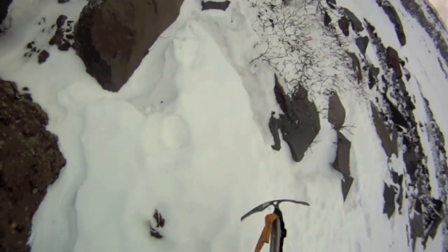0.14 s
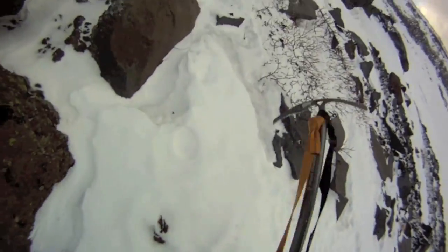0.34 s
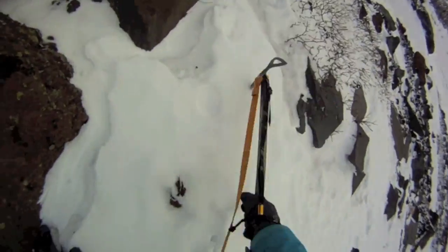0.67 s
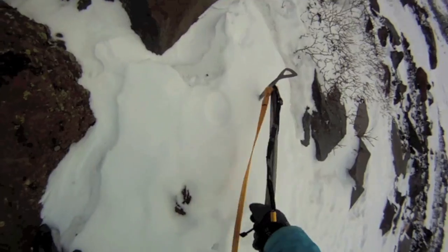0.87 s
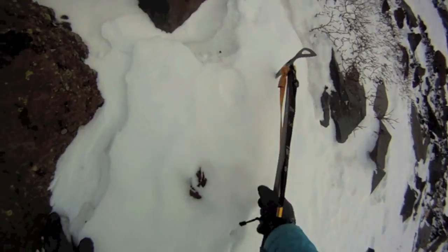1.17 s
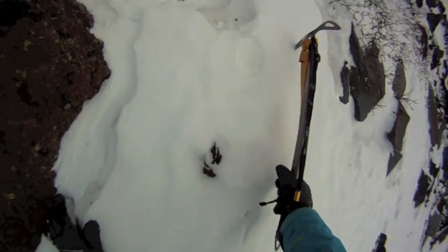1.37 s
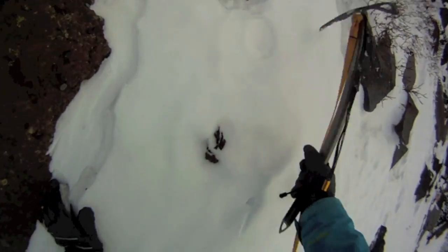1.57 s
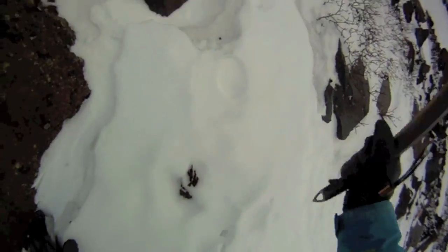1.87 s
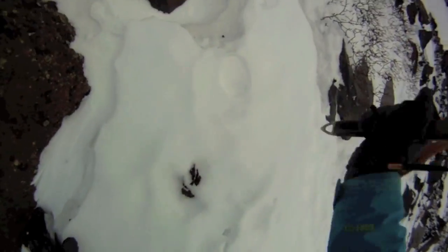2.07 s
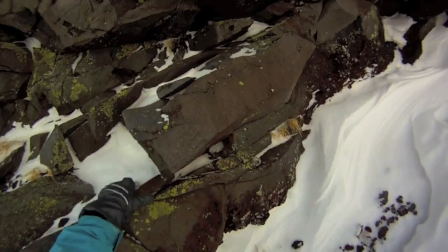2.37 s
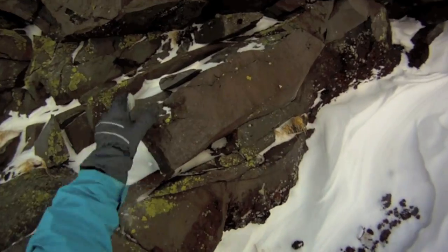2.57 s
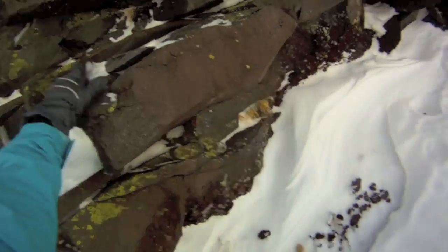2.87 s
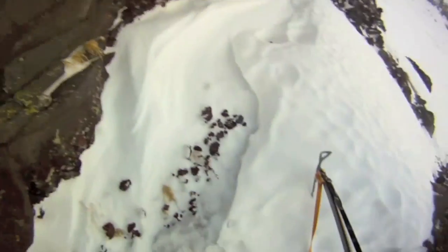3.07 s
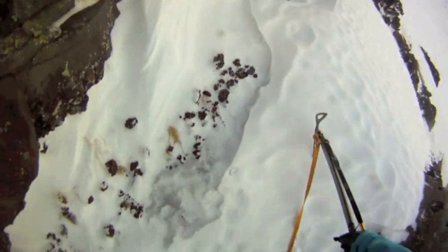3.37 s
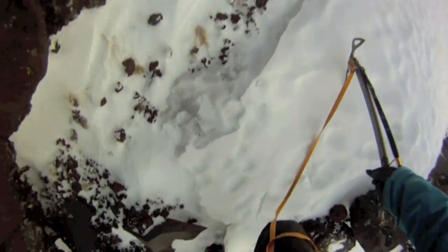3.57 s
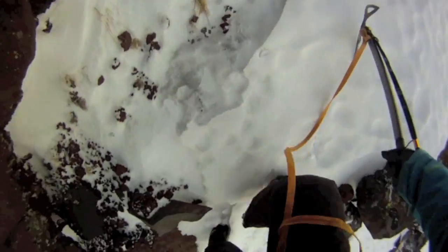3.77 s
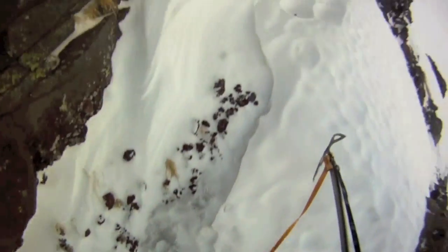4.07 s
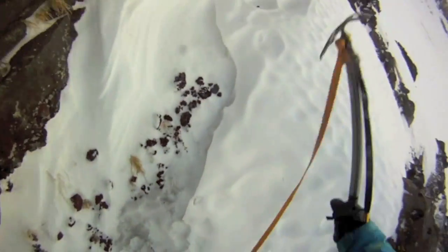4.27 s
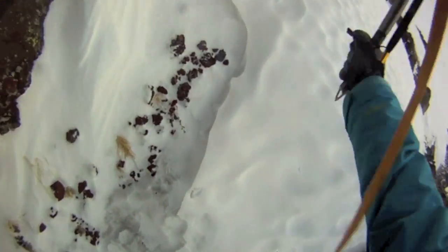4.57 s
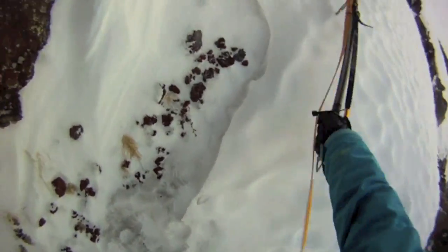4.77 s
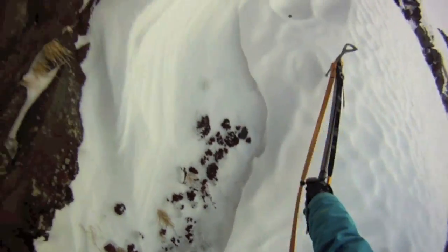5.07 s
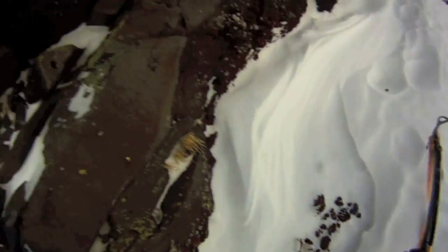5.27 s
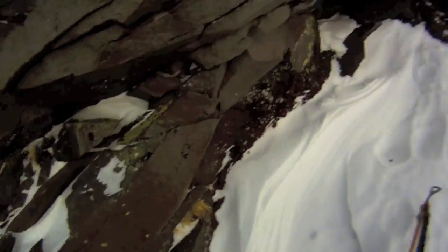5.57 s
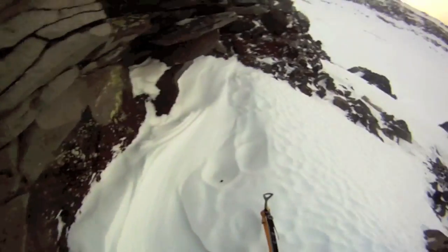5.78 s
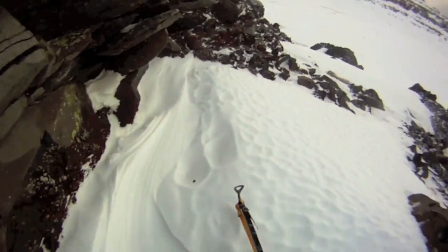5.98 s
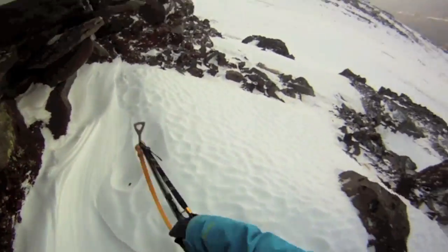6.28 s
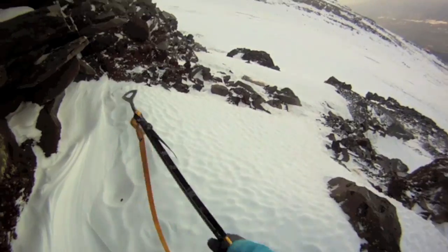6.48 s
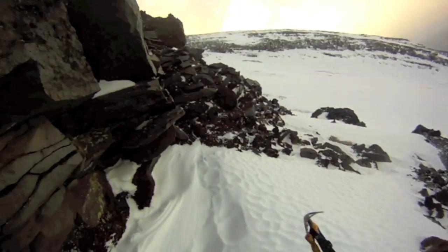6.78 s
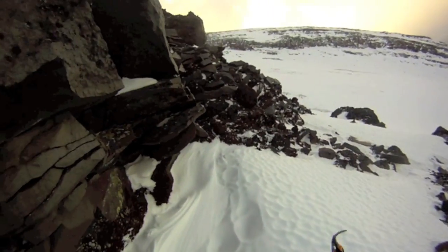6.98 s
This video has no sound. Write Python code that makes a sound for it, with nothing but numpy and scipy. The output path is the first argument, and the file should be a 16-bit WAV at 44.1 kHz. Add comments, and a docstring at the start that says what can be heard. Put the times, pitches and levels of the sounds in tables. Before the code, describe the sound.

Close, low-quality outdoor sound from a climber's head. Sharp bites and raspy scrapes in snow crust come first, tinny and repeating quickly. A near-silent instant leads into full wind, with deep thuds and fluttering rumble that briefly push down the hiss. Soft sleeve and snow rustles fill gaps; later crunches ring metallic and a long stuttering squealing scrape precedes more buffeting.

```python
"""Crunches, scrapes and squeals of steel in hard snow, under gusty wind, as a climber works up a steep slope.
Crampons and an ice axe break the crust and set the steel ringing; cloth and loose snow rustle in noise grains.
Turbulence buffets the microphone of a small head camera; its 12 kHz converter mirrors all into a glassy treble.
The first stretch is thin, with its bass cut and a fast repeating echo; a short fade leads into the full wind."""
import sys
import numpy as np
from scipy import signal
from scipy.fft import rfft, irfft, next_fast_len
from scipy.io import wavfile
from scipy.ndimage import uniform_filter1d

SR = 44100
rng = np.random.default_rng(int(sys.argv[2]) if len(sys.argv) > 2 else 0)


def store_pcm(level_fs):
    """Save levels as 16-bit WAV."""
    pcm = np.round(np.clip(level_fs, -1, 1) * 32767).astype(np.int16)
    wavfile.write(sys.argv[1], SR, np.atleast_2d(pcm).T)


N = 314853
TIME = np.arange(N) / SR

# gusts at the microphone: (start t/s, length t/s, relative level/dB)
GUSTS = [(0, 0.51, -29), (1.68, 0.13, -24.5), (2.21, 0.078, -21.5), (2.46, 0.042, -20), (2.55, 0.2, -28.5),
         (3.05, 0.039, -16.5), (3.23, 0.066, -36), (3.6, 0.27, -20.5), (3.93, 0.087, -31.5),
         (4.3, 0.04, -19), (4.43, 0.04, -6.5), (4.54, 0.25, -18), (4.84, 0.34, -21.5), (5.06, 0.057, -12),
         (5.18, 0.17, -16), (5.79, 0.19, -31), (6.09, 0.13, -15), (6.32, 0.29, -18), (6.7, 0.016, -21),
         (6.94, 0.27, -14)]
GUST_RISE_DB_PER_S, GUST_FALL_DB_PER_S, BREEZE_DB = 262, 157, -40.5
# spectrum of the buffeting: (f/Hz, relative level per Hz/dB)
BUFFET = [(12, -11.5), (40, -3), (70, 0.5), (120, -4.5), (180, -7), (280, -12), (450, -17.5), (650, -29),
          (950, -42.5), (2000, -57), (5000, -78)]
# sleeves rubbing and loose snow sliding as the climber moves: (start t/s, length t/s, level/dB)
SWISHES = [(0, 0.088, -37), (1.7, 0.55, -49.5), (2.46, 0.0094, -37), (2.58, 0.027, -37), (2.76, 0.39, -42),
           (3.59, .08, -31), (3.72, 0.19, -36), (3.88, 0.098, -29), (4.45, 0.011, -43), (5.72, 0.15, -37.5)]
SWISH_RISE_DB_PER_S, SWISH_FALL_DB_PER_S = 108, 114
SPINDRIFT_DB = -47  # snow blowing past all the time
# spectrum of cloth and blown snow: (f/Hz, relative level per Hz/dB)
RUSTLE_COLOUR = [(100, -12.5), (500, 8), (950, -4), (1300, 2), (1900, -5), (2650, 0.5), (3200, -8.5),
                 (4700, -14), (5700, -20)]
# points breaking into the crust, and two faint clicks as wind slaps, at 4.317 and 4.604 s: (t/s, relative
# level/dB, length t/s)
BITES_AND_CLICKS = [(0.095, -17.5, 0.01), (0.65, -15, 0.0055), (1.649, -27.5, 0.0076), (2.087, -29.5, 0.0016),
                    (2.173, -33.5, 0.0027), (2.319, -14, 0.0035), (2.3293, -19, 0.0064), (3.878, -24, .0057),
                    (3.886, -14.5, 0.0061), (4.244, -35.5, 0.0014), (4.317, -29.5, 0.00071), (4.604, -36.5, 0.0017),
                    (4.68, -32, 0.0044), (4.771, -28.5, 0.023), (4.801, -17, 0.0088), (4.888, -24, 0.0016),
                    (4.983, -23.5, 0.0063), (5.001, -21, 0.0038), (5.171, -29.5, 0.0027), (5.192, -25, 0.0027),
                    (5.228, -19.5, .003), (5.596, -16.5, 0.0025), (6.099, -16, 0.0045), (6.741, -44, .001),
                    (6.814, -39, 0.011), (6.898, -34, 0.0046)]
# points pushed or dragged through the crust:
# (start t/s, length t/s, relative level midway/dB, swell from start to end/dB)
STROKES = [(0.1, 0.084, -31, 3.5), (0.652, 0.019, -25.5, 12), (0.702, 0.046, -28, 1),
           (0.811, 0.071, -23, 5), (1.03, 0.085, -32, -5), (1.108, 0.031, -20, -4.5),
           (1.231, 0.33, -25.5, -1), (2.094, .03, -35.5, -1), (2.187, 0.041, -45, -8.5),
           (3.248, 0.14, -40.5, 10.5), (3.874, 0.084, -30, -15), (3.94, 0.043, -24.5, 8),
           (4.02, 0.18, -39.5, -9), (4.813, 0.038, -23.5, -5), (4.885, 0.053, -20, -6.5),
           (4.986, 0.027, -26, -1), (5.027, 0.18, -35.5, 8), (5.241, 0.14, -26.5, -4),
           (5.393, 0.27, -22, 3), (6.059, 0.031, -31.5, 12), (6.104, 0.056, -22.5, -7),
           (6.27, 0.093, -47, 2), (6.815, .06, -55, 12), (6.889, 0.023, -39, 2)]
STROKE_RISE_S, STROKE_FALL_S = .005, .018  # time constants as the weight comes on and off
# how jerkily the crust gives way: (t/s, stick-slip depth/dB)
JERK = [(0, -6.5), (3.3, 2.5), (5.3, 4.5), (5.42, 0), (5.65, 3)]
SLIP_EVEN_S, GRIND_EVEN_S = .05, .04
# spectrum of breaking crust: (f/Hz, relative level per Hz/dB)
CRUST = [(150, -24), (700, -9.5), (950, -13.5), (1250, -7.5), (1500, -8), (2200, -2.5), (2680, 2),
         (2980, -12.5), (3400, -2.5), (4100, -14), (4750, -8.5), (5800, -13.5)]
# ringing modes of the steel: (f/Hz, relative level/dB, 60 dB decay t/s)
STEEL = [(1301, -43, 0.11), (2280, -28.5, 0.06), (2700, -48, 0.075), (3177, -33, 0.054), (4850, -57, 0.23),
         (4740, -37, 0.094), (5170, -37, 0.033)]
# steel squealing on packed snow, and a few narrow tones of struck steel ringing on after hard bites (such as
# near 4.75 kHz at 2.336 and 6.135 s): (start t/s, length t/s, pitch f/Hz, resonator width f/Hz, level/dB)
SQUEALS = [(0.6515, .006, 2480, 160, -11), (0.70, .06, 2680, 400, -28), (0.82, .06, 1260, 120, -31),
           (1.245, .03, 3265, 70, -25), (1.28, .14, 3620, 200, -32), (2.319, .003, 2330, 80, -13),
           (2.331, .007, 2640, 30, -12), (2.336, .016, 4760, 15, -35), (3.33, .09, 3500, 300, -47),
           (4.82, .045, 2680, 330, -28), (5.03, .19, 5000, 450, -44), (5.23, .3, 3620, 160, -37),
           (5.37, .075, 3610, 85, -29), (5.46, .22, 2570, 100, -27), (5.54, .14, 3615, 80, -31),
           (5.55, .13, 3060, 80, -35), (6.115, .035, 2800, 250, -26), (6.135, .038, 2210, 50, -27),
           (6.135, .05, 4750, 50, -39), (6.157, .022, 3270, 70, -39)]
# single eddies slapping the microphone: (t/s, relative level/dB, f/Hz)
SLAPS = [(2.486, 8, 134), (3.058, 3, 110), (4.321, 13, 152), (4.534, 3, 131), (4.721, 4.5, 141),
         (5.004, 1, 205), (5.067, -3, 80), (5.602, -1, 268), (6.198, -3, 75), (6.219, -5, 280),
         (6.243, -5, 240), (6.387, 2, 105), (6.947, 5, 106), (7.128, -5, 121)]
SLAP_TEAR = 0.19  # how strongly fine turbulence tears each eddy
# microphone and converter
LIMIT_DB, LIMIT_RELEASE_DB_PER_S, LIMIT_ATTACK_S = 1.0, 26, 0.0017
CONVERTER_HZ, CUTOFF_HZ = 12000, 15350
# the thin first stretch
BASS_CUT_HZ = 1760
ECHO_S, ECHO_END_S = .1183, 2.39
ECHO_SHARE, ECHO_FEEDBACK = 0.74, 0.5452
# gain through the fade between the two stretches: (t/s, level/dB)
FADE = [(2.34, -2), (2.37, -21), (2.39, -41), (2.405, -6.5), (2.43, -3)]


def from_db(db):
    """Amplitude ratio of a level in dB."""
    return 10 ** (np.asarray(db) / 20)


def rms_one(x):
    """Scales x to rms 1."""
    return x / np.sqrt(np.mean(x ** 2) + 1e-20)


def in_time(rows):
    """A curve over time joined by straight lines."""
    return np.interp(TIME, *np.transpose(rows))


def drift(rate):
    """Smooth chance of spread 1 that changes about rate times a second."""
    # two equal poles smooth noise at a tenth of SR; the first 4000 steps settle unheard
    pole = np.exp(-20 * np.pi * rate / SR)
    noise = rng.standard_normal(N // 10 + 4002)
    slow = signal.lfilter([1], [1, -2 * pole, pole * pole], noise)[4000:]
    return np.interp(np.arange(N) / 10, np.arange(len(slow)), rms_one(slow))


def coloured(x, spectrum):
    """Causal (minimum-phase) filter; white noise keeps its rms, counted below half the converter rate."""
    size = 2 * next_fast_len(N // 2 + SR // 8)
    hz, db = np.transpose(spectrum)
    grid = np.maximum(np.arange(size // 2 + 1) * SR / size, 1)
    gain = from_db(np.interp(np.log(grid), np.log(hz), db))
    gain /= np.sqrt(np.mean(gain ** 2 * (grid < CONVERTER_HZ / 2)))
    # folding the cepstrum onto positive time gives minimum phase
    cepstrum = irfft(np.log(gain))[:size // 2]
    cepstrum[1:] *= 2
    response = np.exp(rfft(cepstrum, size))
    return irfft(rfft(x, size) * response)[:N]


def ring(force, hz, t60):
    """A resonance with 60 dB decay time t60: a unit click starts a sine of height 1."""
    radius, angle = from_db(-60 / (t60 * SR)), 2 * np.pi * hz / SR
    feedback = [1, -2 * radius * np.cos(angle), radius * radius]
    return signal.lfilter([0, np.sin(angle)], feedback, force + 1e-18)


def evened(x, span_s):
    """Keeps the fine grain of x, with rms near 1 over each span."""
    power = uniform_filter1d(x * x, max(int(span_s * SR), 2))
    return x / np.sqrt(np.abs(power) + 1e-12)


def swells(rows, rise_db_per_s, fall_db_per_s, floor_db):
    """Strength of events that build, hold and ebb, their power added to a steady floor."""
    power = from_db(floor_db) ** 2
    for start, length, db in rows:
        before_s = np.maximum(start - TIME, 0)
        after_s = np.maximum(TIME - start - length, 0)
        short_db = rise_db_per_s * before_s + fall_db_per_s * after_s
        power = power + from_db(db - np.minimum(short_db, 120)) ** 2
    return np.sqrt(power)


def contact(start, length, rise_s, fall_s):
    """Force of one contact: it rises, holds and dies away."""
    force = np.zeros(N)
    first = int(start * SR)
    t = TIME[:min(N - first, int((length + 10 * fall_s) * SR))]
    rise = 1 - np.exp(-t / rise_s)
    force[first:first + len(t)] = rise * np.exp(-np.maximum(t - length, 0) / fall_s)
    return force


def fractures(per_s, spread_db, powder_db):
    """Ice bonds snap at random over the hiss of powder; a wider spread makes a few snaps large."""
    sizes = from_db(spread_db * np.minimum(rng.exponential(1, N), 5)) * rng.choice([-1, 1], N)
    snaps = rms_one(sizes * (rng.random(N) < per_s / SR))
    return rms_one(snaps + from_db(powder_db) * rng.standard_normal(N))


def wind():
    """Turbulence reaches the microphone in lumps, a few dozen a second, swelling with each gust."""
    eddies = rng.standard_normal(N) * from_db(3.03 * drift(36))
    buffeting = evened(coloured(eddies, BUFFET), span_s=0.095)
    strength = swells(GUSTS, GUST_RISE_DB_PER_S, GUST_FALL_DB_PER_S, BREEZE_DB)
    return from_db(1.5) * strength * buffeting


def rustle():
    """Blown snow and rubbing cloth make a patter of fine grains."""
    grains = fractures(per_s=3000, spread_db=3.5, powder_db=1) * from_db(2 * drift(51))
    strength = swells(SWISHES, SWISH_RISE_DB_PER_S, SWISH_FALL_DB_PER_S, SPINDRIFT_DB)
    return strength * coloured(grains, RUSTLE_COLOUR)


def crampons():
    """Grinding, biting and two faint slap clicks shake the crust and the steel; where the steel slides it
    squeals."""
    stick_slip = evened(from_db(in_time(JERK) * drift(88)), span_s=SLIP_EVEN_S)
    breaking = fractures(per_s=3000, spread_db=0, powder_db=1.0) * stick_slip
    grind = from_db(-2.5) * evened(breaking, span_s=GRIND_EVEN_S) * pressure_on_crust()
    blows = sum(from_db(db) * contact(s, length, rise_s=.0004, fall_s=.0011) for s, db, length in BITES_AND_CLICKS)
    bites = blows * evened(rng.standard_normal(N), span_s=0.0028)
    crust = coloured(grind + from_db(1) * bites, CRUST)
    return crust + ringing_steel(bites, grind) + squeals(stick_slip)


def pressure_on_crust():
    """Each stroke sets in quickly, swells or slackens as the weight shifts, and lets go."""
    pressure = 0
    for start, length, db, swell_db in STROKES:
        progress = np.clip((TIME - start) / length, 0, 1)
        level = from_db(db + swell_db * (progress - .5))
        pressure = pressure + level * contact(start, length, STROKE_RISE_S, STROKE_FALL_S)
    return pressure


def ringing_steel(bites, grind):
    """Bites and grinding feed the modes of the steel, which ring on and decay."""
    steel = 0
    for hz, db, t60 in STEEL:
        # as the point of contact wanders, each mode takes its own changing share of the grind
        share = from_db(-7.5 + 4.5 * drift(6.2))
        steel = steel + from_db(db) * ring(bites + share * grind, hz, t60)
    return steel


def squeals(stick_slip):
    """Noise feeds a sharp resonance, twice over: a grainy tone that stutters with each slip; mostly friction
    squeals, a few the ring of struck steel."""
    friction, out = rng.standard_normal(N), 0
    for start, length, hz, width_hz, db in SQUEALS:
        t60 = np.log(1000) / (np.pi * width_hz)
        tone = evened(ring(ring(friction, hz, t60), hz, t60), span_s=length * .4)
        stutter = evened(tone * np.sqrt(stick_slip), span_s=length)
        pressure = contact(start, length, rise_s=length * .12, fall_s=min(length * .2, .005))
        out = out + from_db(db) * stutter * pressure
    return out


def slaps():
    """A large eddy passes the microphone as one quick suck and push of pressure."""
    out, damping = np.zeros(N), 2.7  # damping per cycle
    for s, db, hz in SLAPS:
        near = np.abs(TIME - s) < .05
        cycles = (TIME[near] - s) * hz
        out[near] += from_db(db) * np.sin(2 * np.pi * cycles) * np.exp(-damping * np.abs(cycles))
    return out * (1 + SLAP_TEAR * drift(460))


def limiter(x):
    """Pressure peaks over the limit push the gain down fast; it creeps back, so the hiss ducks after them."""
    over_db = np.maximum(20 * np.log10(np.abs(x[0]) + 1e-9) - LIMIT_DB, 0)
    # a running maximum against a rising ramp lets the cut shrink at the release rate
    release_db = LIMIT_RELEASE_DB_PER_S * TIME
    cut_db = np.maximum.accumulate(over_db + release_db) - release_db
    return x * from_db(-uniform_filter1d(cut_db, max(int(LIMIT_ATTACK_S * SR), 1)))


def converter(x):
    """Each 12 kHz sample is held four times, which mirrors the sound about 6 and 12 kHz; peaks round off."""
    slow = signal.resample_poly(x, CONVERTER_HZ, SR, axis=1, padtype="edge")
    driven = slow * 1.045
    held = np.repeat(1.1 * np.tanh(driven / 1.1), 4, axis=1)
    return signal.resample_poly(held, SR, 4 * CONVERTER_HZ, axis=1, padtype="edge")[:, :N]


def echo(x):
    """Adds evenly spaced repeats over one second, each about half the repeat before."""
    out, lag = x.copy(), round(ECHO_S * SR)
    for k, delay in enumerate(range(lag, SR, lag)):
        out[:, delay:] += ECHO_SHARE * ECHO_FEEDBACK ** k * x[:, :-delay]
    return out


def scene():
    """Wind, rustle, steel in snow and slaps add up at the one microphone."""
    return (wind() + rustle() + crampons() + slaps())[None]


def record(dry):
    """Peaks are limited; a thin, echoing stretch fades into the plain sound; the top is cut."""
    plain = converter(limiter(dry))
    bass_cut = signal.butter(1, BASS_CUT_HZ, "high", fs=SR, output="sos")
    thin = echo(signal.sosfilt(bass_cut, plain))
    out = np.where(TIME < ECHO_END_S, thin, plain) * from_db(in_time(FADE))
    out = out * np.minimum((TIME[-1] - TIME) / .003, 1)  # 3 ms fade at the very end
    top_cut = signal.ellip(10, .3, 70, CUTOFF_HZ, fs=SR, output="sos")
    return signal.sosfilt(top_cut, out)


dry = scene()
out = record(dry)
store_pcm(out)
```